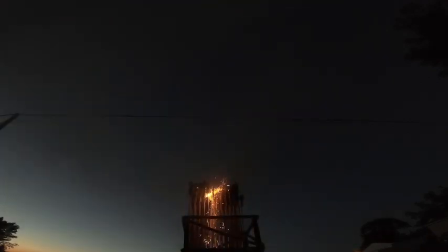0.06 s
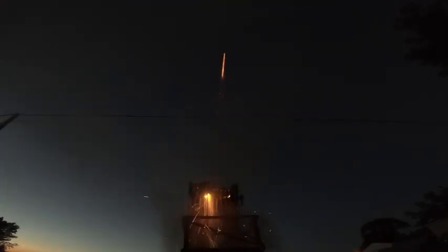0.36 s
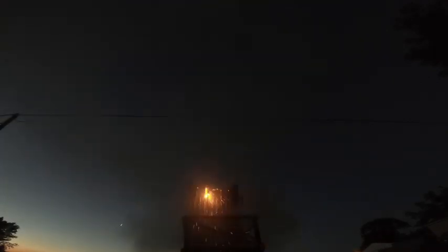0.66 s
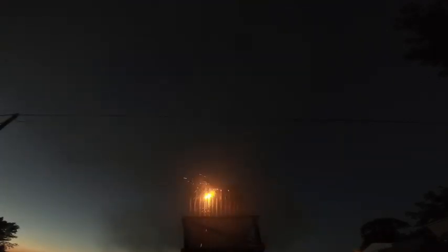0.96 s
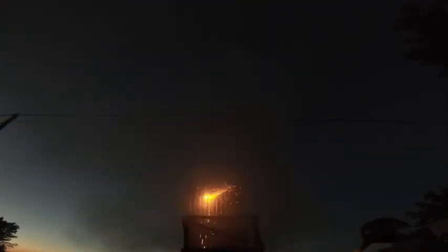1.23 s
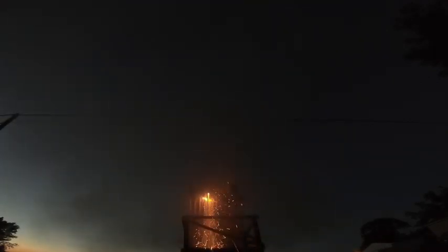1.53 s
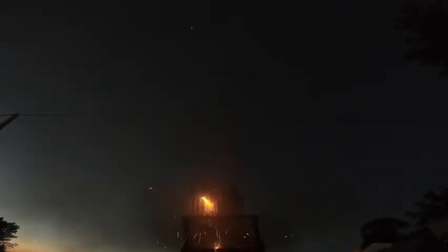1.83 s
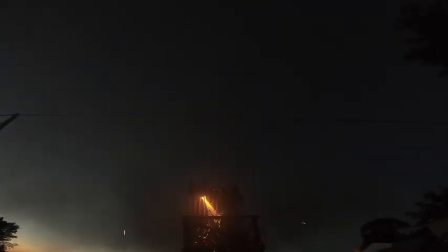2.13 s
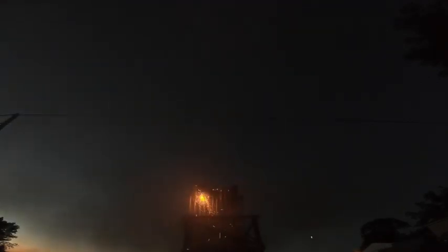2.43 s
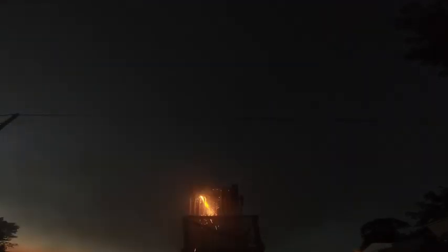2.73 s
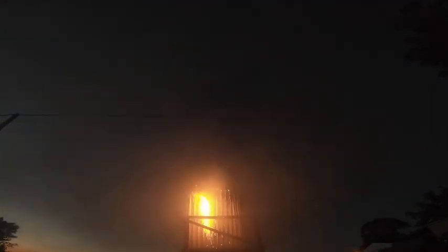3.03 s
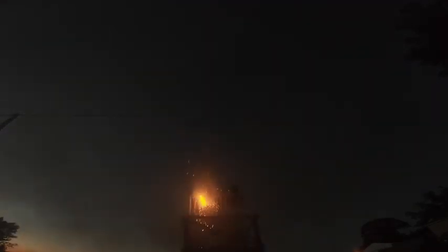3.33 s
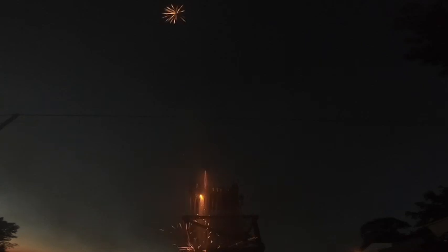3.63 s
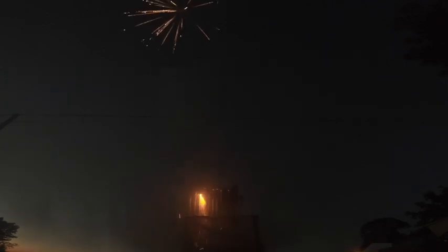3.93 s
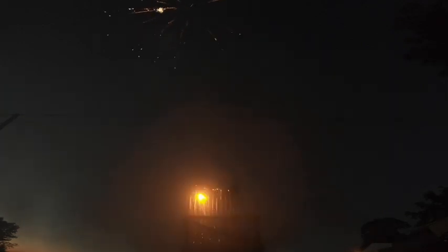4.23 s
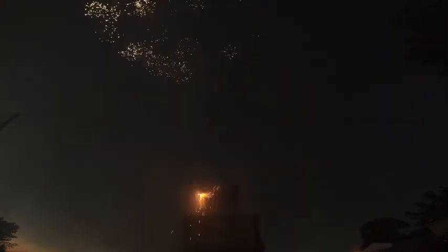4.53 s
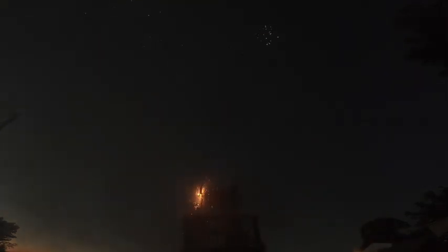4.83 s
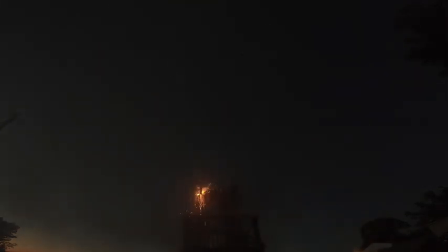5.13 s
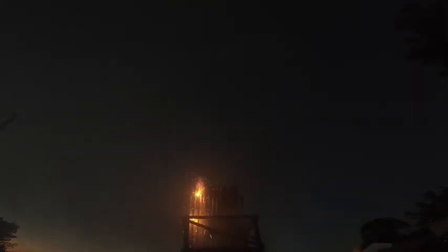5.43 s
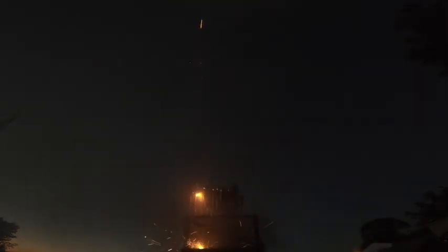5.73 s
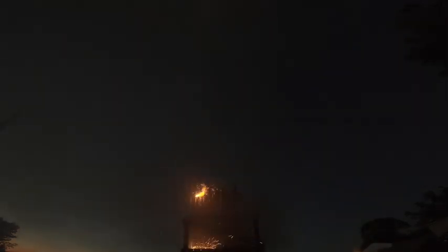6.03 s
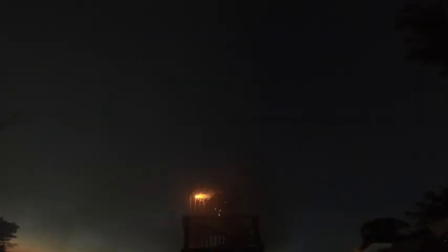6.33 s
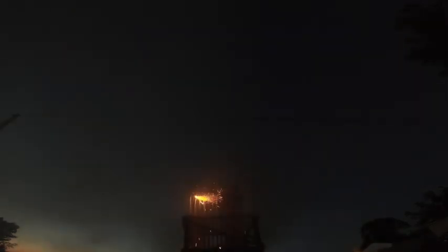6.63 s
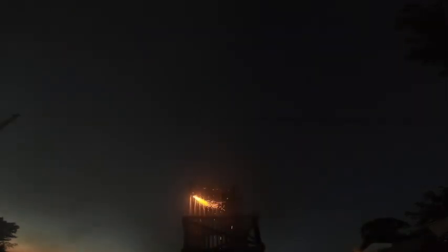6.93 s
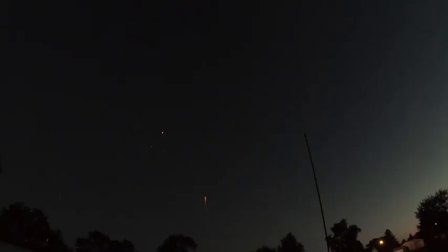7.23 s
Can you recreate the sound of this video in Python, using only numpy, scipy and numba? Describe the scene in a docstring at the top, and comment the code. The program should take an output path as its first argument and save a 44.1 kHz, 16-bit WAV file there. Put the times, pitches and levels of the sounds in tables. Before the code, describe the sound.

A bottle rocket leaves a nearby rack right at the start, with a hissing whoosh and hard sputtering pops lasting about half a second. The hiss sweeps downward as it climbs. A fuse fizzes faintly between launches over quiet garden air. A second, shorter whoosh comes at 1.5 seconds. At 2.6 seconds the loudest bang cracks overhead, with a long echo rolling off houses and trees. A third rocket launches at 3.5 seconds, overlapped by a duller bang at 3.7. Faint distant pops arrive near 4.3 seconds, then a bright cluster of crackles runs until 4.7. The fourth rocket whooshes up at about 5.5 seconds, followed by a sharp echoing bang at 5.8. Dull, faraway pops and a faint rapid string of them sound from 6.4 to 6.8 seconds. The fuse sizzles on until a soft low rumble replaces everything at about 7.2 seconds.

```python
"""A sputtering whoosh opens as the first of four bottle rockets leaves a rack in a garden at dusk. A fuse
fizzes between launches; charges bang and crackle overhead, echoing from houses and trees. Each motor is a
turbulent jet. Its reflection off a hard surface beside the microphone comes later as the rocket rises, so the
hiss sweeps down. Faint pops sound far off; then the scene changes to a low rumble."""
import sys
import numpy as np
from scipy import signal
from scipy.fft import rfft, irfft, next_fast_len
from scipy.io import wavfile
from numba import njit

SR = 44100
rng = np.random.default_rng(int(sys.argv[2]) if len(sys.argv) > 2 else 0)


def persist_wave(psi):
    """Save psi, clipped to +-1, as 16-bit WAV."""
    counts = np.round(np.clip(psi, -1, 1) * 32767).astype(np.int16)
    wavfile.write(sys.argv[1], SR, np.atleast_2d(counts).T)


N = 329427
TIME_S = np.arange(N) / SR

# Background spectra. Each row: frequency in Hz, relative level in dB.
EVENING_SPECTRUM = [(25, -41), (70, -16), (140, -9), (270, 2), (450, -17), (750, -27), (1300, -18),
                    (3000, -14.5), (9000, -32.5), (15000, -34)]
RUMBLE_SPECTRUM = [(15, -31), (25, -10), (124, -2.5), (331, -20), (555, -14), (1200, -23), (2480, -25.5),
                   (3210, -25.5), (3660, -34.5), (6460, -29), (12000, -61), (15600, -112)]
# Spectra of distant echoes and nearby scatter. Each row: frequency in Hz, relative level in dB.
ECHO_SPECTRUM = [(40, -9.5), (130, -1.5), (300, 2.5), (550, 4.5), (1000, -7), (1600, -4), (3000, 2),
                 (6000, 2), (10000, 1.5), (15000, -11)]
SCATTER_SPECTRUM = [(300, 4), (1200, 6.5), (5000, -2.5), (10000, -6), (12500, -3), (15000, -31)]
# Spectra of the burning fuse and the jet. Each row: frequency in Hz, relative level in dB.
FIZZ_SPECTRUM = [(300, -1), (800, -8.5), (1300, -1), (2200, -5), (3200, 1), (5000, -4.5), (7000, -8.5),
                 (11000, -13), (15000, -45)]
SIZZLE_SPECTRUM = [(3000, -30), (6500, -9.5), (8200, 0), (9300, 4), (10800, -5), (12200, -21), (15500, -38)]
JET_RACK_SPECTRUM = [(60, -26), (250, -3.5), (700, -15), (1300, -7.5), (2200, -6.5), (3100, -1.5),
                     (4500, -4.5), (7000, -5), (9100, 4), (10500, -4.5), (12200, -16), (15500, -25.5)]
JET_ALOFT_SPECTRUM = [(60, -17), (250, -10.5), (750, -5), (1400, -7.5), (2200, -1.5), (3400, 0), (5000, 2),
                      (6800, 0.5), (9400, 4), (11000, -0.5), (12500, -7.5), (15500, -17)]
# Spectra of single shocks. Each row: frequency in Hz, relative level in dB.
FAR_POP_SPECTRUM = [(40, -32), (150, -8.5), (320, 2), (550, -2), (1000, -7.5), (2200, -15), (4000, -14),
                    (7000, -29), (15000, -34)]
STAR_SPECTRUM = [(40, -14.5), (200, 7), (400, 6.5), (900, -1), (2000, -4.5), (4500, -0.5), (6500, -4.5),
                 (9800, 3), (12000, -10), (15500, -29.5)]
BANG_SPECTRUM = [(30, -49.5), (80, -0.5), (170, 4), (280, 4), (480, -4), (900, -1), (1400, -11),
                 (2500, -11.5), (4800, -16.5), (6500, -32), (9500, -19), (15000, -23.5)]
COUGH_SPECTRUM = [(30, -38), (90, -1), (170, 1.5), (300, 0), (500, -13), (900, -11), (2000, -13.5),
                  (5000, -6.5), (15000, -29.5)]
# Stereo width at the two microphone ports. Each row: frequency in Hz, side minus mid in dB.
STEREO_WIDTH = [(100, -15), (500, -13), (1200, -4), (2500, -4.5), (5000, -23.5), (8000, -8), (11000, -1),
                (15000, 1)]
# Port imbalance. Each row: frequency in Hz, left minus right in dB.
PORT_BALANCE = [(60, -1.5), (150, -1.5), (400, -3.5), (1100, -5.5), (2500, -0.5), (5500, 0), (9000, 0.7),
                (13000, -1.5)]

# Loudest distant pops. Each row: start in seconds, level in dB, treble corner in Hz.
LOUD_FAR_POPS = [(4.2507, -21.5, 970), (4.2635, -37, 600), (4.276, -24.5, 700), (4.279, -35, 600),
                 (4.358, -28, 700), (6.3698, -23, 1400), (6.3948, -22.5, 1700), (6.474, -31, 2030)]
# Fuse envelope. Each row: time in seconds, fizz in dB, sizzle in dB.
FUSE_LEVELS = [(0.701, -63, -62.5), (1.121, -58, -58), (1.4, -50, -48), (2.05, -68, -60), (2.4, -58, -60),
               (3.1, -54, -58), (3.42, -47, -50), (4.15, -58, -80), (4.85, -59, -51), (5.2, -51, -50),
               (6.25, -59, -64), (6.72, -55, -60), (6.98, -50, -54), (7.22, -49.5, -50.5)]
# Spurts of fuse sparks. Each row: start in seconds, fizz in dB, sizzle in dB, decay in seconds.
FUSE_SPURTS = [(0.985, -54, -89.5, 0.077), (1.235, -51, -40.5, 0.052), (3.152, -63, -44, 0.016),
               (3.265, -57, -52, 0.048), (6.616, -41.5, -54, 0.011)]
# Loudest crackling stars. Each row: start in seconds, level in dB.
LOUD_STARS = [(4.3343, -15), (4.3618, -21), (4.3857, -14), (4.4033, -9.5), (4.4306, -10), (4.439, -8),
              (4.4483, -11), (4.4508, -15.5), (4.4685, -11.5), (4.4892, -9.5), (4.4936, -13),
              (4.4958, -5.5), (4.515, -14), (4.5244, -8.5), (4.5386, -10.5), (4.5544, -8), (4.559, -11.5),
              (4.6804, -7.5), (4.6979, -9.5)]
# Charges overhead. Each row: start in seconds, level in dB, treble corner in Hz, bass shelf in dB.
CHARGES = [(2.595, 4.5, 8000, -3.5), (3.6775, -1.5, 1100, 2), (5.8196, 1.5, 8000, -2.5)]
# Loudest motor coughs. Each row: start in seconds, level in dB.
LOUD_COUGHS = [(0.078, -19), (.184, -3.5), (.321, -3.5), (.405, -3.5), (0.423, -4), (.463, -9), (0.53, -12),
               (1.475, -22), (1.491, -19), (1.547, -10.5), (1.724, -8), (1.762, -14.5), (3.536, -4.5),
               (3.789, -9), (5.776, -13)]
# Rocket flights. Each row: full thrust in seconds, build-up in dB/s, mid-climb in seconds,
# climb time scale in seconds, burn-out in seconds, relative hiss in dB, distance fade in dB/s,
# extra treble fade in dB/s, relative roar in dB, roar pitch at mid-climb in Hz.
FLIGHTS = [(0.214, 73.5, 0.3, 0.034, 0.527, -20.5, 13, 18.5, -13, 198),
           (1.547, 250, 1.65, 0.022, 1.761, -19.5, 60, 81, -16, 225),
           (3.561, 353, 3.666, 0.023, 3.804, -20, 23.5, 16, -16, 209),
           (5.477, 135, 5.620, 0.026, 5.773, -19.5, 32.5, 16, -13.5, 197)]

RACK_LAG_S, SKY_LAG_S = 0.000618, 0.00107  # reflection delay, source on the rack and aloft


def undb(db):
    """Decibels to gain."""
    return 10 ** (np.asarray(db) / 20)


def unit(x):
    """Scale to rms 1."""
    return x / np.sqrt(np.mean(x ** 2))


def bin_gains(spectrum, size):
    """Gain of a (Hz, dB) spectrum on each FFT bin."""
    hz, db = np.transpose(spectrum)
    bin_hz = np.arange(size // 2 + 1) * SR / size
    return undb(np.interp(np.log(bin_hz + 1), np.log(hz), db))


def colour(x, spectrum):
    """Filter by a (Hz, dB) spectrum."""
    size = next_fast_len(x.shape[-1], True)
    return irfft(rfft(x, size) * bin_gains(spectrum, size), size)[..., :x.shape[-1]]


def noise(spectrum):
    """Coloured stereo noise at rms 1; the ports agree least in the top treble."""
    mid, side = rng.standard_normal((2, N))
    side = colour(side, STEREO_WIDTH)
    return unit(colour(np.array([mid + side, mid - side]), spectrum))


def flicker(rate_hz):
    """Interpolated random values with a spread near 1."""
    return 1.2 * np.interp(TIME_S * rate_hz, np.arange(8192), rng.standard_normal(8192))


@njit
def bandpass(x, centre_hz, width_hz):
    """State-variable band-pass with moving centre and width."""
    y, band_state, low_state = np.empty(len(x)), 0., 0.
    for i in range(len(x)):
        g, damping = np.tan(np.pi * centre_hz[i] / SR), width_hz[i] / centre_hz[i]
        band = (band_state + g * (x[i] - low_state)) / (1 + g * (g + damping))
        band_state, low_state = 2 * band - band_state, low_state + 2 * g * band
        y[i] = damping * band
    return y


def shocks(rows, spectrum, size=2048):
    """One pressure shock per row, dulled above its own corner."""
    out, hz = np.zeros(N + size), np.arange(size // 2 + 1) * SR / size
    for start_s, peak_db, corner_hz in rows:
        cepstrum = irfft(np.log(bin_gains(spectrum, size) / np.hypot(1, hz / corner_hz)))
        cepstrum[1:size // 2] *= 2  # causal pulse: steep front, then rebound
        cepstrum[size // 2 + 1:] = 0
        shock = irfft(np.exp(rfft(cepstrum)))
        start = int(start_s * SR)
        out[start:start + size] -= undb(peak_db) * shock / np.abs(shock).max()
    return np.array([out, out])[:, :N]


def shower(from_s, to_s, per_s, level_db, corner_hz, spread_db=1.8):
    """Rows of shocks, uneven in spacing and strength."""
    jitter, strength = rng.random((40, 2)).T
    starts_s = from_s + (np.arange(len(jitter)) + jitter) / per_s
    levels_db = level_db + spread_db * np.sqrt(12) * (strength - .5)
    return [(s, db, corner_hz) for s, db in zip(starts_s, levels_db) if 0 < s < to_s]


def evening():
    """Faint, nearly steady garden air."""
    return noise(EVENING_SPECTRUM) * undb(-59 + 0.26 * flicker(19))


def rumble():
    """Low, slightly wavering noise."""
    return noise(RUMBLE_SPECTRUM) * undb(-45 + 1.1 * flicker(14))


def echoes(x, rise_s, early_s, late_db, t60_s, patchy_db, ground=0.32):
    """Returns from ground, houses and trees: an early cluster, then a long roll."""
    t = TIME_S[:2 * SR]
    mid, side, patches = rng.standard_normal((3, len(t)))
    rise = np.minimum(t / rise_s, 1) ** 2 * (1 - ground) + ground
    fall = np.exp(-np.maximum(t - rise_s, 0) / early_s) + undb(late_db - 60 * t / t60_s)
    surfaces = undb(patchy_db * np.interp(t * 140, np.arange(len(t)), patches))
    returns = np.array([mid + .5 * side, mid - .5 * side])
    response = colour(returns * rise * fall * surfaces, ECHO_SPECTRUM)
    return signal.fftconvolve(x, unit(response) / np.sqrt(len(t)), axes=1)[:, :N]


def reflect(x, lag_s, gain):
    """Add the duller reflection from the surface beside the microphone."""
    dull = colour(x, [(2500, -1.5), (6000, -25.5), (12000, -20)])
    return x + gain * np.array([np.interp(TIME_S - lag_s, TIME_S, channel) for channel in dull])


def scatter(x, gain_db, decay_s):
    """Add the brief spray that nearby objects throw back after each shock."""
    pole = np.exp(-2 / (decay_s * SR))
    power = signal.lfilter([1 - pole], [1, -pole], colour(x[0], SCATTER_SPECTRUM) ** 2)
    return x + undb(gain_db) * np.sqrt(power) * noise(SCATTER_SPECTRUM)


def far_pops():
    """Dull distant shocks, ending in a faint string."""
    string = shower(from_s=6.525, to_s=6.77, per_s=45, level_db=-31.5, corner_hz=1209.7)
    return shocks(LOUD_FAR_POPS + string, FAR_POP_SPECTRUM)


def fuse(attack_s=0.0097):
    """A burning fuse: fizz, high sizzle and sudden spurts of sparks."""
    times_s, fizz_db, sizzle_db = np.transpose(FUSE_LEVELS)
    fizz = undb(np.interp(TIME_S, times_s, fizz_db))
    sizzle = undb(np.interp(TIME_S, times_s, sizzle_db))
    for start_s, spurt_fizz_db, spurt_sizzle_db, decay_s in FUSE_SPURTS:
        age_s = np.maximum(TIME_S - start_s, 0)
        spurt = np.minimum(age_s / attack_s, 1) * np.exp(-age_s / decay_s)
        fizz += undb(spurt_fizz_db) * spurt
        sizzle += undb(spurt_sizzle_db) * spurt
    burn = noise(FIZZ_SPECTRUM) * fizz + noise(SIZZLE_SPECTRUM) * sizzle
    return reflect(burn, RACK_LAG_S, gain=0.048) * undb(2 * flicker(25) + flicker(500))


def crackling_stars(corner_hz=12500):
    """Stars pop overhead in a cluster of small, bright shocks."""
    rows = [(s, db, corner_hz) for s, db in LOUD_STARS]
    rows += shower(from_s=4.45, to_s=4.508, per_s=115, level_db=-14.5, corner_hz=corner_hz)
    ticks = reflect(shocks(rows, STAR_SPECTRUM), lag_s=0.000995, gain=0.68)
    return scatter(ticks, gain_db=-3.5, decay_s=0.00065)


def charge_bangs(shelf_hz=220):
    """Each charge bursts as one shock with its own weight of bass."""
    bangs = np.zeros((2, N))
    for start_s, peak_db, corner_hz, bass_db in CHARGES:
        spectrum = [(hz, db + bass_db / (1 + (hz / shelf_hz) ** 4)) for hz, db in BANG_SPECTRUM]
        bangs += shocks([(start_s, peak_db, corner_hz)], spectrum)
    return scatter(reflect(bangs, lag_s=0.00097, gain=0.22), gain_db=-11, decay_s=0.00018)


def motor_coughs(loud_corner_hz=1600):
    """The motors burn unevenly: a few loud coughs, many small ones."""
    rows = [(s, db, loud_corner_hz) for s, db in LOUD_COUGHS]
    for full_s, _, _, _, burnout_s, *_ in FLIGHTS:
        rows += shower(full_s - 0.07, burnout_s, per_s=17, level_db=-22.5, corner_hz=2200)
    return reflect(shocks(rows, COUGH_SPECTRUM), lag_s=0.0011, gain=0.31)


def flight_curves():
    """Each motor builds up, fades as it climbs and cuts off; sparks hiss on behind it."""
    cutoff_db_per_s, trail_db, trail_db_per_s = 448, -38, 112
    lead_s, swell_s, fade_s, roar_floor_db = 0.0041, 0.042, 0.042, -25.5
    hiss, treble, roar, trail, pitch_hz, progress = np.zeros((6, N))
    for (full_s, build_db_per_s, halfway_s, climb_s, burnout_s,
         hiss_db, fade_db_per_s, treble_db_per_s, roar_db, roar_hz) in FLIGHTS:
        since_s = TIME_S - halfway_s
        aloft_s, spent_s = np.maximum(since_s, 0), np.maximum(TIME_S - burnout_s, 0)
        thrust_db = -build_db_per_s * np.maximum(full_s - TIME_S, 0) - cutoff_db_per_s * spent_s
        # swell as the rocket clears the rack, just before mid-climb
        cleared_s = since_s + lead_s
        width_s = np.where(cleared_s < 0, swell_s, fade_s)
        swell = np.exp(1 - np.hypot(1, cleared_s / width_s * np.sqrt(2)))
        jet_db = hiss_db + thrust_db + 0.5 * swell - fade_db_per_s * aloft_s
        hiss += undb(jet_db)
        treble += undb(jet_db - treble_db_per_s * aloft_s)
        roar += undb(roar_db + thrust_db) * (swell + undb(roar_floor_db))
        trail += (since_s > 0) * undb(trail_db - trail_db_per_s * spent_s)
        lit = since_s > -.5
        pitch_hz[lit], progress[lit] = roar_hz, since_s[lit] / climb_s
    return hiss, treble, roar, trail, pitch_hz, progress


def exhaust_roar(pitch_hz, height, away, end_to_start_ratio=0.37):
    """The exhaust roars in the rack, lower as the gas column lengthens."""
    centre_hz = pitch_hz * end_to_start_ratio ** (away - .5)
    width_hz = centre_hz * (1.05 - 0.9 * height)
    band = bandpass(rng.standard_normal(N), centre_hz, width_hz)
    return unit(bandpass(band, centre_hz, width_hz) / np.sqrt(width_hz))


def jet_hiss(height, away, from_hz=7800, to_hz=3700):
    """Turbulent jet; its strongest band slides down as the nozzle turns toward the listener."""
    jet = np.sqrt(1 - height) * noise(JET_RACK_SPECTRUM) + np.sqrt(height) * noise(JET_ALOFT_SPECTRUM)
    band_hz = from_hz * (to_hz / from_hz) ** away
    band = np.array([bandpass(channel, band_hz, 0.18 * band_hz) for channel in jet])
    # a hollow runs ahead of the band
    hollow = np.array([bandpass(channel, 0.798 * band_hz, 0.16 * band_hz) for channel in jet])
    jet = jet + 3.5 * away * (1 - away) * band - 0.36 * (1 - height) * hollow
    lag_s = RACK_LAG_S + (SKY_LAG_S - RACK_LAG_S) * height
    jet = reflect(jet, lag_s, gain=0.51)
    jet = reflect(jet, 2 * lag_s, gain=0.14)  # second bounce
    return unit(jet) * undb(3 + 1.01 * flicker(70) + 0.47 * flicker(600))


def rockets():
    """Hiss, roar and spark trail of the climbing rockets; distance takes the treble first."""
    hiss_gain, treble_gain, roar_gain, trail_gain, pitch_hz, progress = flight_curves()
    height = (1 + np.tanh(progress / 2)) / 2
    away = (1 + np.tanh(progress / 5.23)) / 2  # 0 to 1, slower than height
    jet = jet_hiss(height, away)
    body = colour(jet, [(5000, 5), (8000, -19.5), (12000, -17)])
    hiss = body * hiss_gain + (jet - body) * treble_gain
    roar = exhaust_roar(pitch_hz, height, away) * roar_gain * undb(-4.5)
    return hiss + roar + noise(SIZZLE_SPECTRUM) * trail_gain


def scene():
    """Fireworks and their echoes over a quiet evening; then the scene changes to a low rumble."""
    launches = rockets() + motor_coughs()
    bangs, stars, far = charge_bangs(), crackling_stars(), far_pops()
    echo = undb(-30) * echoes(launches, rise_s=0.033, early_s=0.068, late_db=2.5, t60_s=1.6,
                              patchy_db=-0.5)
    echo += undb(-11.5) * echoes(bangs, rise_s=0.084, early_s=0.056, late_db=-3, t60_s=4.1,
                                 patchy_db=1.5)
    echo += undb(-10) * echoes(stars, rise_s=0.0067, early_s=0.09, late_db=1, t60_s=3.6, patchy_db=4)
    echo += undb(-8.5) * echoes(far, rise_s=0.004, early_s=0.0059, late_db=-14, t60_s=2.6, patchy_db=4)
    air, ending = evening(), rumble()
    garden = launches + bangs + stars + far + echo + fuse() + air
    scene_change_s, crossfade_s = 7.24, 0.017
    changed = np.clip((TIME_S - scene_change_s) / crossfade_s, 0, 1)
    return (1 - changed) * garden + changed * ending


def record(dry):
    """The ports differ a little in colour; the bangs overload; the top is cut."""
    left = colour(dry[0], [(hz, db / 2) for hz, db in PORT_BALANCE])
    right = colour(dry[1], [(hz, -db / 2) for hz, db in PORT_BALANCE])
    top_hz = 15800
    lowpass = signal.ellip(8, .2, 70, top_hz, fs=SR, output="sos")
    return signal.sosfilt(lowpass, np.clip([left, right], -1, 1))


dry = scene()
out = record(dry)
persist_wave(out)
```